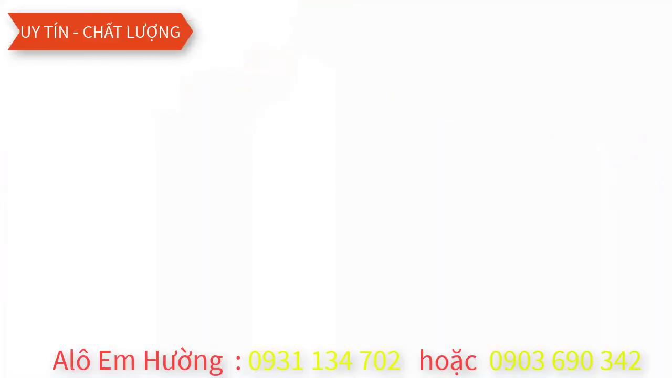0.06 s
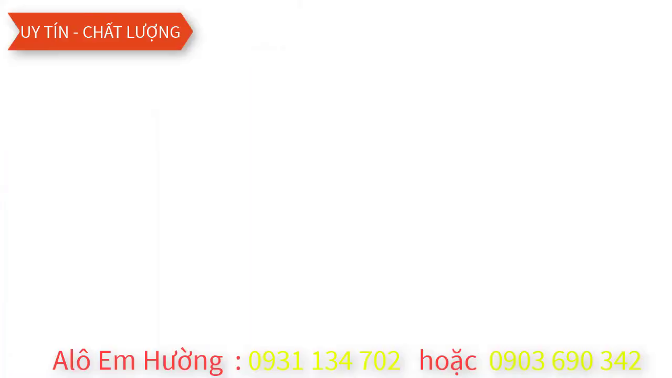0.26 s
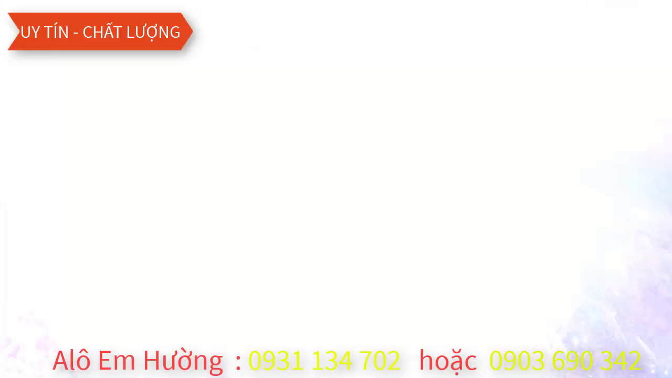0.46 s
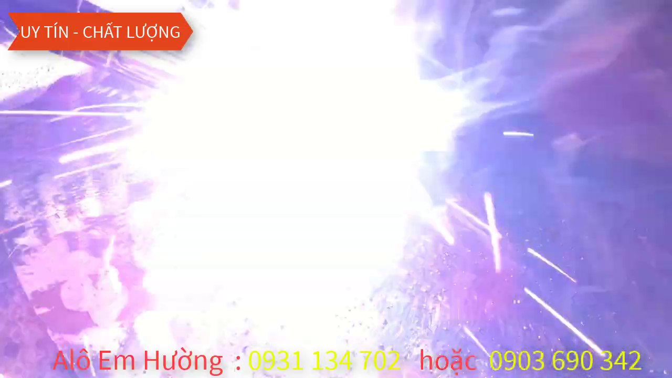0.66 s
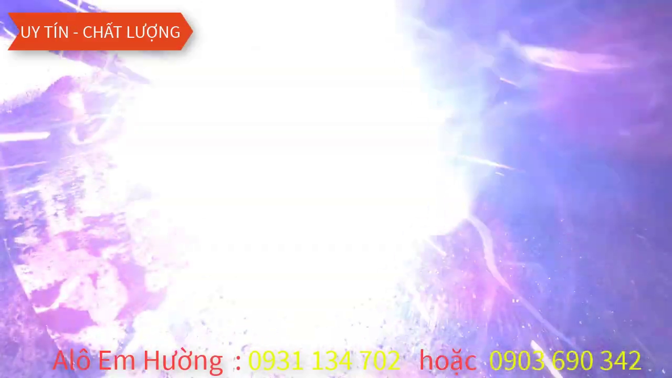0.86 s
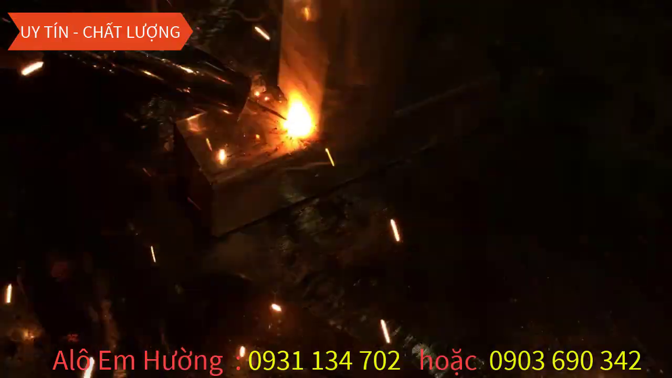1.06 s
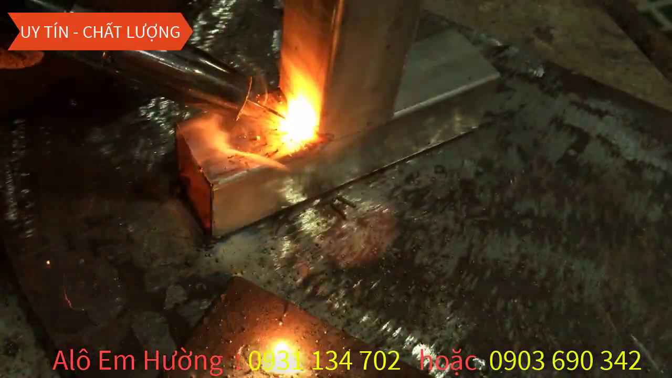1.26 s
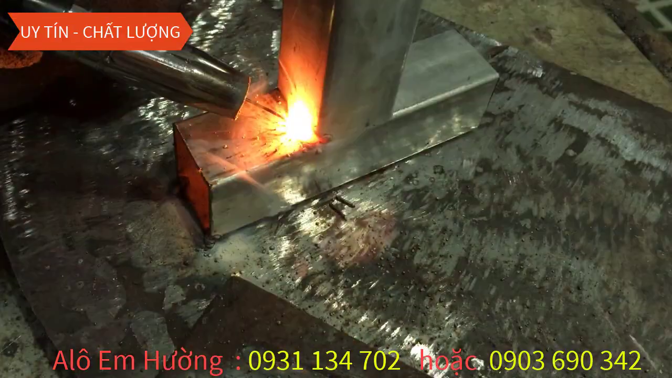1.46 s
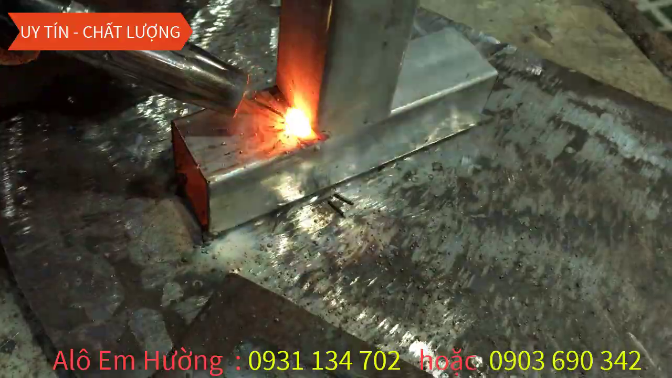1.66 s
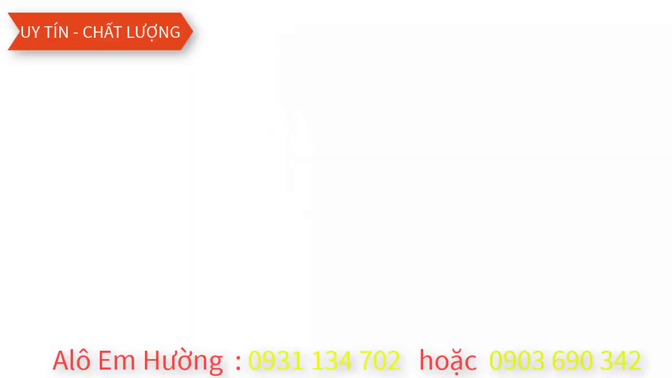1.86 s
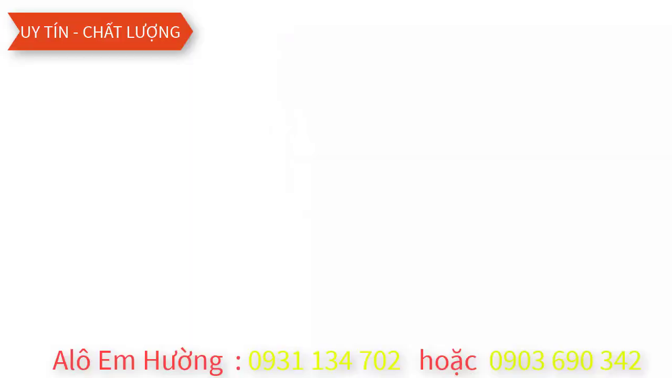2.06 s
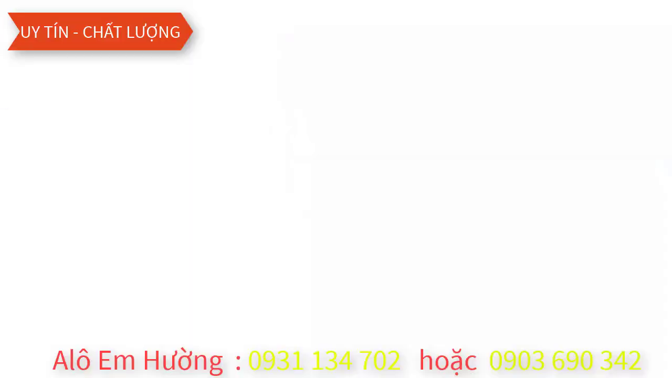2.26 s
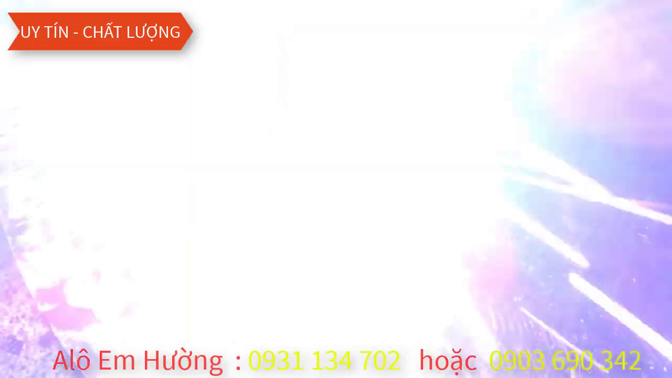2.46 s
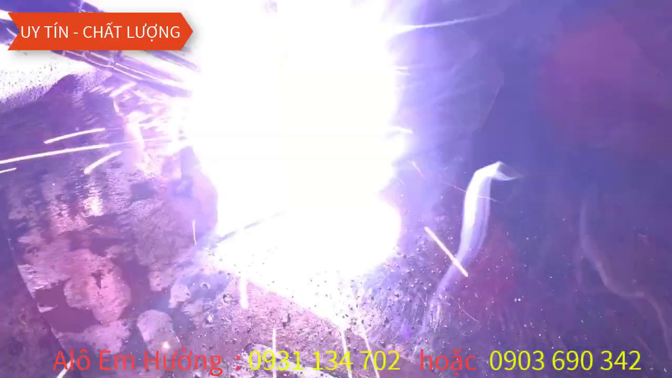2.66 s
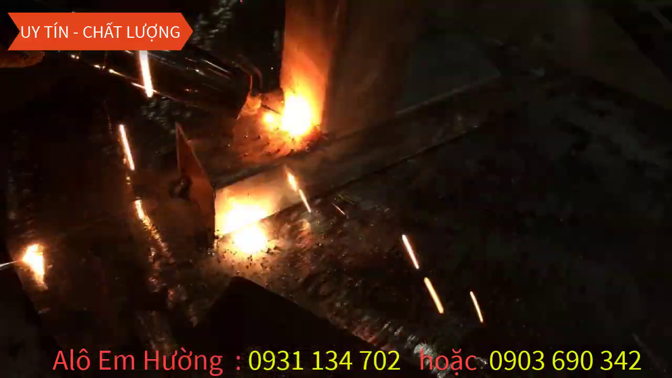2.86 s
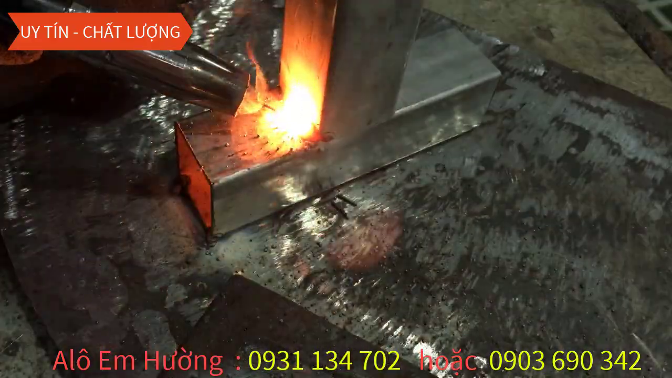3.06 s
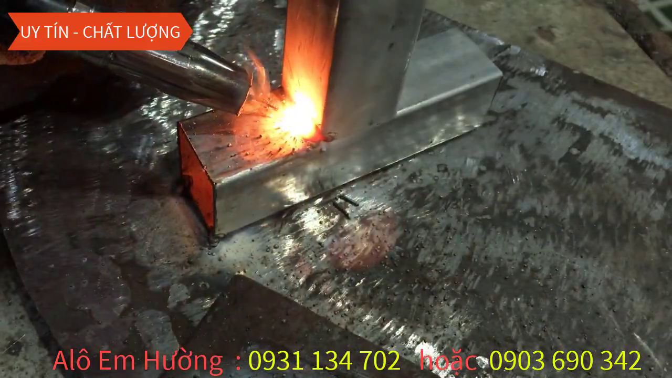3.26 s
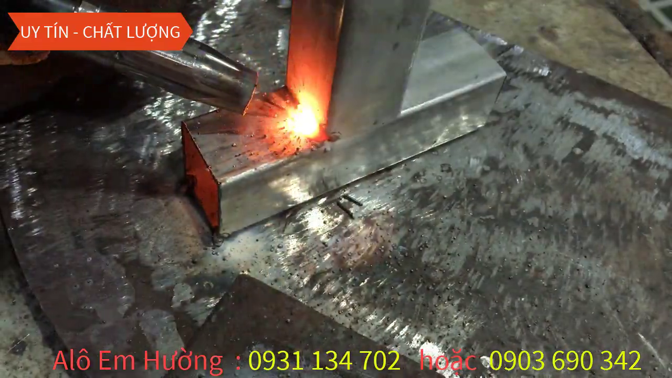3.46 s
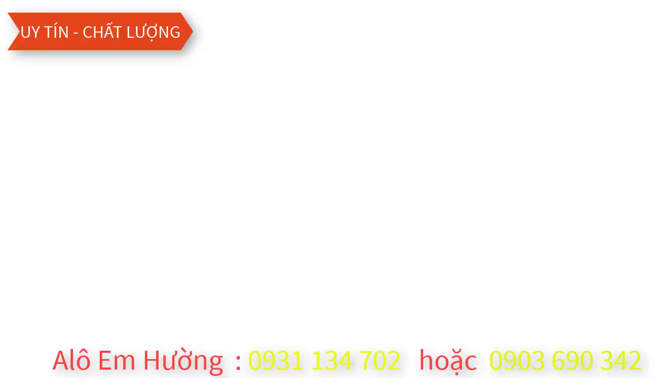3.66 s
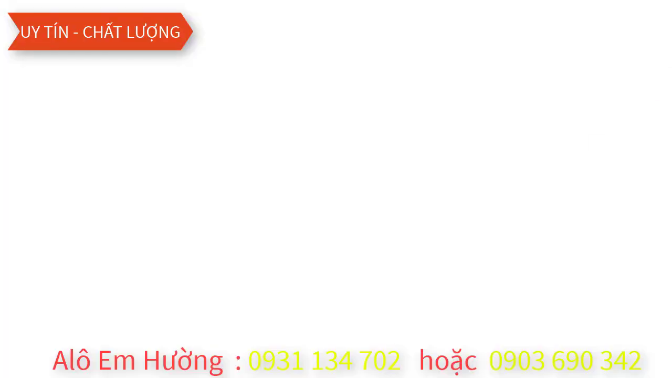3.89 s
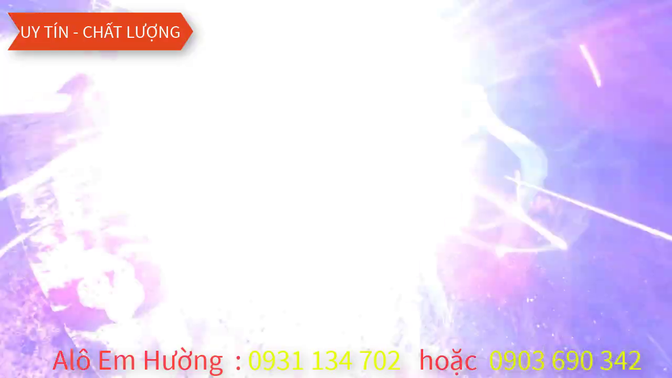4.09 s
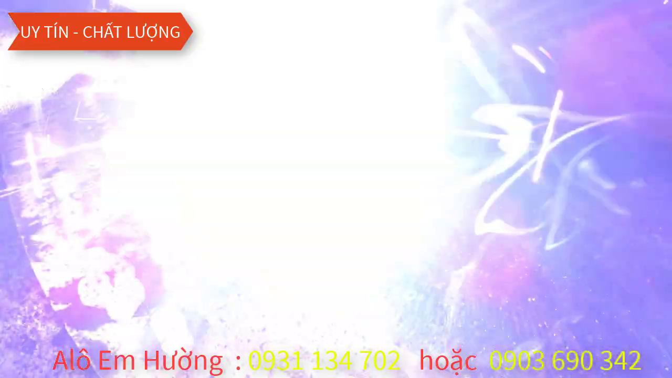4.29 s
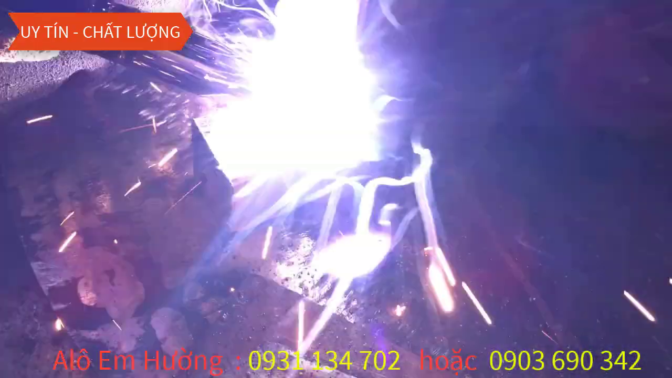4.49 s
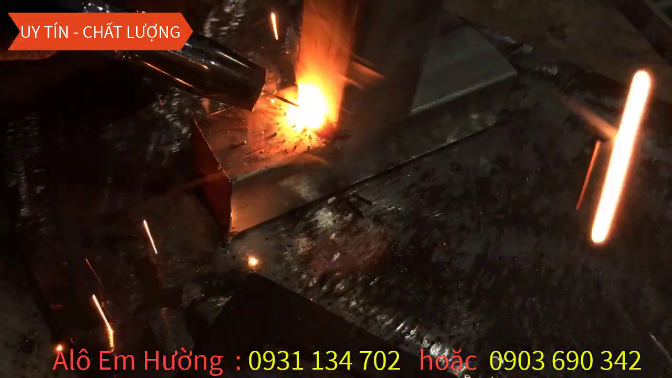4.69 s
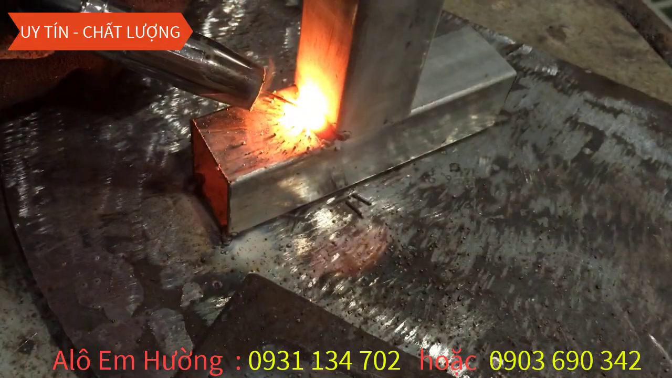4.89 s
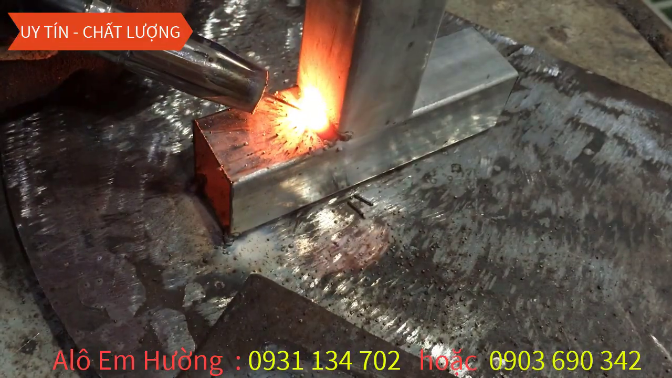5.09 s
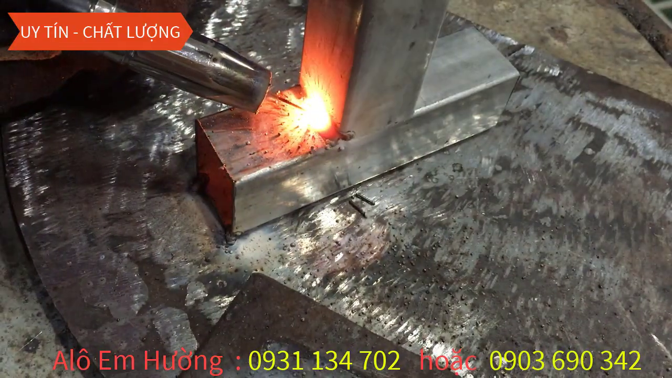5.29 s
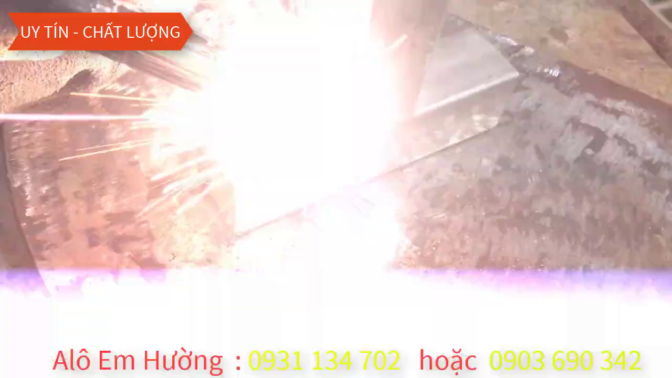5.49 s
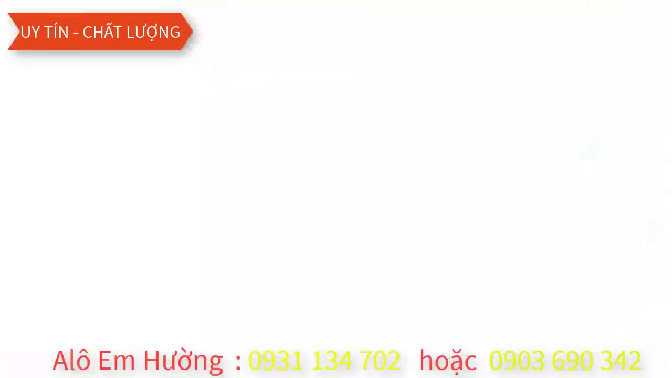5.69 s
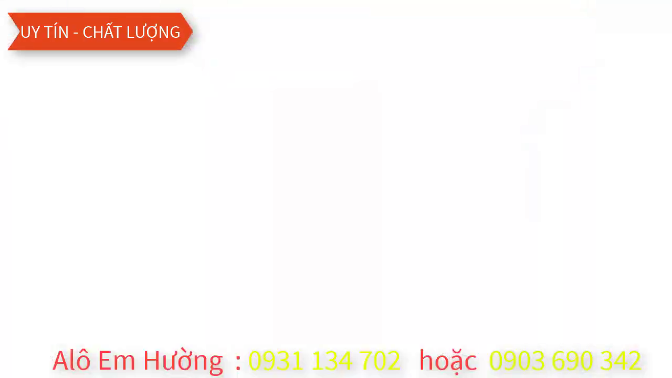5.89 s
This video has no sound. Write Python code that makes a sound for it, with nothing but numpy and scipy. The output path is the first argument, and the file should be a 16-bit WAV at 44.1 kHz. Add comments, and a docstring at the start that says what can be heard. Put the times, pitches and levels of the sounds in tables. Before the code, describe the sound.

Short bursts of arc welding spit, snap and pop very close by, stopping and restarting over a faint workshop fan.

```python
"""A flux-cored welding arc crackles in four short runs on steel tubing, very close to the microphone.
Each short circuit makes the arc's gas jump in pressure and radiate a sharp crack; between them the
pool sizzles and gurgles. In the pauses the cooling bead ticks and a machine fan drones in the workshop.
The recorder delays low frequencies more than high ones, dispersing each jump into a falling thump."""
import sys
import numpy as np
from scipy import signal
from scipy.fft import rfft, irfft, next_fast_len
from scipy.io import wavfile
from scipy.ndimage import map_coordinates

SR = 44100
rng = np.random.default_rng(int(sys.argv[2]) if len(sys.argv) > 2 else 0)


def store_pcm(level_fs):
    """Save levels as 16-bit WAV."""
    pcm = np.round(np.clip(level_fs, -1, 1) * 32767).astype(np.int16)
    wavfile.write(sys.argv[1], SR, np.atleast_2d(pcm).T)


N = 261954

# fan air noise, banded by the machine's housing: frequency_hz, relative_db
FAN_SPECTRUM = [(18, -31), (30, -10), (69, -6.5), (250, -11.5), (374, -11.5), (600, -9.5), (774, -13),
                (1200, -11.5), (1480, -15), (1700, -26), (1910, -17.5), (2140, -28.5), (2530, -20),
                (3000, -28), (3450, -22.5), (4100, -25.5), (4830, -30), (5660, -26.5), (6960, -31.5),
                (7720, -37.5), (15000, -43.5)]
# fan tones: pitch_hz, relative_db
FAN_TONES = [(372, -14), (467, -24), (652, -8), (870, -18), (1305, -14.5), (1491, -5.5), (1958, -26)]
# dip of the drone, one per run: depth_db
DRONE_DIPS = [-19.5, -17, -14.5, -10]
# sizzle envelope from strike to extinction, one list per run: time_s, level_db
ARC_RUNS = [
    [(.022, -57), (.057, -18), (.11, -42), (.152, -45.5), (.186, -40), (.274, -49), (.342, -35.5),
     (.385, -33.5), (.5, -37), (.618, -34.5), (.83, -30.5), (.93, -33.5), (1.1, -31.5), (1.122, -41.5)],
    [(1.888, -46), (1.913, -37), (1.919, -21), (2.0, -23), (2.03, -31.5), (2.074, -31.5), (2.147, -23.5),
     (2.4, -27.5), (2.479, -19.5), (2.66, -27), (2.822, -30.5), (2.849, -40.5)],
    [(3.62, -44), (3.645, -44), (3.664, -21), (3.714, -23), (3.778, -37.5), (3.95, -34), (3.97, -26),
     (4.03, -27.5), (4.232, -26), (4.352, -31), (4.558, -26.5), (4.666, -35), (4.684, -43)],
    [(5.594, -36), (5.622, -38.5), (5.63, -23), (5.65, -22.5), (5.709, -47), (5.738, -29), (5.809, -41),
     (5.94, -35.5)],
]
# arc noise in the tube corner: frequency_hz, relative_db
ARC_SPECTRUM = [(880, -32.5), (1500, -2.5), (2680, -10), (3680, -2.5), (4140, 0), (4660, -3.5), (5290, 0),
                (6320, -4.5), (8170, -5.5), (8840, -1), (10100, -16.5), (11800, -5.5), (14300, -9),
                (15800, -7.5)]
# distinct droplet snaps: start_s, relative_db, body_db (weight of the jump against the crack)
SNAPS = [(0.0257, 1, -22), (0.0545, -3, -20), (0.1284, -11, -19), (0.1939, -13, -14), (0.385, -4, -15),
         (0.4124, -8, -14), (0.4433, -7, -11), (0.4909, -10, -9), (0.5312, -4, -10), (0.6612, -9, -10),
         (0.7209, -5, -11), (0.7608, -5, -14), (0.7763, -7, -14), (0.8134, -7, -13), (0.9297, -7, -11),
         (0.9472, -6, -10), (1.8911, -1, -22), (1.9673, -2, -15), (1.9816, -1, -13), (1.993, -2, -11),
         (2.0119, -4, -19), (2.0487, -4, -18), (2.0524, -2, -10), (2.0586, -6, -16), (2.0622, -1, -12),
         (2.0839, 0, -11), (2.0865, 1, -10), (2.0892, 0, -12), (2.0962, -1, -11), (2.1096, 0, -11),
         (2.1226, -1, -9), (2.1379, -2, -11), (2.1446, -2, -11), (2.1509, -1, -11), (2.1723, -3, -15),
         (2.1774, -1, -12), (2.1805, -2, -14), (2.1899, -3, -13), (2.2046, -2, -16), (2.2339, 0, -13),
         (2.2498, 0, -11), (2.257, 0, -9), (2.2647, 1, -12), (2.2765, -2, -8), (2.2809, -2, -10),
         (2.2985, -2, -13), (2.3111, 0, -13), (2.3234, -3, -10), (2.3264, -4, -15), (2.3389, -4, -18),
         (2.3511, -4, -14), (2.3566, -2, -17), (2.3628, -3, -17), (2.3781, -2, -14), (2.3845, -1, -11),
         (2.387, -1, -9), (2.4494, -3, -13), (2.4539, -3, -14), (2.4693, -2, -13), (2.4743, 0, -9),
         (2.4884, -1, -11), (2.4952, -1, -14), (2.5238, -1, -13), (2.5683, -1, -9), (2.5888, -2, -10),
         (2.6144, -3, -11), (2.6467, -1, -5), (2.6533, -3, -9), (2.6665, -6, -7), (2.6747, -4, -13),
         (2.7531, -4, -11), (2.8129, -8, -16), (3.6238, 1, -22), (3.6537, -1, -17), (3.6702, -1, -14),
         (3.6886, -1, -9), (3.7039, -2, -11), (3.7162, -2, -14), (3.752, 0, -10), (3.7907, -9, -21),
         (3.8786, -6, -18), (3.964, 0, -12), (3.9717, 0, -10), (3.9785, -1, -19), (3.9812, 1, -14),
         (3.9852, -3, -19), (3.9917, -1, -14), (4.0319, -4, -18), (4.0533, -2, -17), (4.0697, -1, -20),
         (4.0775, -1, -14), (4.091, -4, -16), (4.1042, -2, -11), (4.1199, -1, -14), (4.1327, -3, -24),
         (4.1385, -3, -13), (4.148, -1, -9), (4.159, 0, -15), (4.1753, 0, -12), (4.2074, -1, -10),
         (4.2183, 1, -14), (4.2264, 0, -11), (4.2303, -2, -11), (4.2359, -1, -11), (4.2581, -3, -9),
         (4.3209, -5, -14), (4.3394, -5, -13), (4.3831, -4, -14), (4.4105, -2, -12), (4.4163, -2, -11),
         (4.4306, -1, -18), (4.495, -4, -14), (4.5113, -3, -13), (4.5178, -4, -15), (4.5584, -5, -10),
         (4.5659, -5, -16), (4.5706, -5, -18), (4.5924, -5, -12), (4.6071, -3, -8), (4.621, -1, -13),
         (5.6292, -6, -27), (5.6331, -2, -20), (5.8494, -10, -15), (5.8699, -10, -21), (5.9353, -4, -12)]
# short circuits: start_s, jump_amplitude (signed), settle_ms, crack_relative_db
POPS = [(0.0774, -1.82, 18, 2), (0.1494, 1.9, 11, -5.5), (.2796, -1.66, 2.3, -3.5), (0.3706, 0.75, 3.9, -3),
        (0.3777, 0.5, 4, -8), (0.3808, 1.37, 6.1, -3), (0.3931, 0.8, 9.5, -1), (.4334, 1, 0.71, 2),
        (0.4355, 0.1, 2.4, -20), (.4574, -1.84, 3.5, -5), (.5119, 2.1, 2.1, -15), (.556, 0.78, 0.82, -3),
        (0.6377, -0.05, 2.6, -6.5), (.8498, 1.8, 2.2, -9), (0.8545, -1.3, 0.85, -8),
        (0.8784, -1.35, 3.1, -8), (0.8917, 1.5, 5.1, -2.5), (0.8991, -1.6, 3.9, -14),
        (0.9248, 1.2, 1.5, -8), (.926, -1.1, 1.5, -8), (0.9288, 1, 1, -10), (0.9437, 0.87, 2.6, -4),
        (0.9634, 0.7, .8, -5.5), (0.9946, -1.4, 1.7, -6.5), (1.0153, 1.45, 2, -26),
        (1.0619, 0.9, 0.78, -8.5), (1.9312, -1.06, 2.1, 4.5), (1.934, 0.5, 3.7, 1), (1.9443, 0.6, 9, -18),
        (2.002, 1.5, 8.3, -17), (2.1834, 0, 1.6, -3), (2.2282, 0.73, 7.3, 3), (2.586, 0.63, 9, -3),
        (2.619, 1.75, 12, -1), (2.6344, 1.8, 1.8, -2), (2.6358, -1.5, 3.6, -10), (2.7271, -1.78, 2.6, -9),
        (2.7475, 1.7, 1.2, -5), (2.7637, 2.3, 0.65, -7), (2.7896, 0.5, 1.6, -15), (2.7966, -1.2, 1, -7.5),
        (3.696, 0.45, 12, -8), (3.6965, 0.5, 4, -17), (3.7127, -0.9, 5.2, -1), (3.7234, 2, 14, -16),
        (3.7801, 0.7, 1.1, -3.5), (4.2537, 1.68, 6.3, -13), (4.2795, -1.1, 5.9, -2), (4.2893, 1.43, 11, 0),
        (4.3138, -1, 9.7, -1), (4.3426, -0.7, 0.88, -4.5), (4.4132, 0.86, 1.2, 0.5), (4.5544, 1.4, 6.2, -6),
        (4.611, 1.6, 2.3, -4), (4.6483, 0.3, 2.4, -10.5), (5.5971, 1.46, 8.5, -1.5),
        (5.6536, -1.44, 8.2, -4), (5.7458, .9, 11, -7), (5.7496, 2.5, 3.9, -9), (5.8215, -1.0, 0.68, -12),
        (5.8937, -.4, 0.51, -4.5)]
# swarms of small pressure jumps in the pool: start_s, length_s, level_db
GURGLES = [(.35, 0.022, -19), (.637, 0.0057, -16.5), (1.941, 0.0051, -7), (1.972, .022, -8),
           (2.4, 0.0094, -13), (3.688, 0.027, -15), (5.685, .04, -19), (5.724, 0.017, -11),
           (5.808, 0.012, -20)]
# ticks of the cooling bead: start_s, relative_db
TICKS = [(1.25, -49.5), (1.8034, -34.5), (3.5084, -35), (4.9867, -35), (5.1053, -39), (5.178, -34),
         (5.4725, -33)]
# second-order high-pass stages: cutoff_hz, quality_factor
LOW_CUTS = [(59.6, 1.085), (36, 1.29)]
# all-pass stages that delay the bass: corner_hz
ALL_PASSES = [270, 270, 330]


def amp(db):
    """Amplitude grows tenfold for every 20 dB."""
    return 10 ** (np.asarray(db) / 20)


def unit_rms(x):
    """Normalisation to unit mean power."""
    return x / np.sqrt(np.mean(x ** 2))


def wobble(rate_hz):
    """Spline interpolation of random values gives a smooth fluctuation."""
    knots = rng.standard_normal(int(N * rate_hz / SR) + 4)
    return map_coordinates(knots, [np.arange(N) * rate_hz / SR])


def filtered(x, response):
    """A linear filter multiplies the spectrum by its frequency response."""
    size = next_fast_len(N + SR // 2)
    return irfft(rfft(x, size) * response(np.fft.rfftfreq(size, 1 / SR)), size)[..., :N]


def coloured(x, spectrum):
    """Minimum-phase filtering: folding the cepstrum gives a causal response with the given spectrum."""
    hz, db = np.transpose(spectrum)
    size = 2 ** 13
    gain = unit_rms(amp(np.interp(np.log(np.fft.rfftfreq(size, 1 / SR) + 1), np.log(hz), db)))
    cepstrum = irfft(np.log(gain))
    fold = np.r_[1, np.full(size // 2 - 1, 2), np.zeros(size // 2)]
    return signal.fftconvolve(x, irfft(np.exp(rfft(cepstrum * fold))))[:N]


def place(start_s, pulses):
    """Superposition of pulses, one per row, each at its start time."""
    index = np.round(start_s * SR).astype(int)[:, None] + np.arange(pulses.shape[1])
    return np.bincount(index.ravel(), pulses.ravel(), N + SR)[:N]


def jumps(start_s, height, settle_ms, samples):
    """Pressure steps relax exponentially; the gas cannot follow above a few kHz."""
    t_ms = np.arange(samples) / SR * 1000
    steps = place(start_s, height[:, None] * np.exp(-t_ms / np.reshape(settle_ms, (-1, 1))))
    return filtered(steps, lambda hz: 1 / (1 + 1j * hz / 4500) ** 2)


def cracks(start_s, db, shock, t60_s, tail_db, tail_t60_s):
    """A shock front leads an exponentially decaying noise burst and a weaker tail from nearby steel."""
    t = np.arange(600) / SR
    envelope = amp(-60 * t / t60_s) + amp(tail_db - 60 * t / tail_t60_s)
    pulses = envelope * rng.standard_normal((len(start_s), len(t))) - shock * (t == 0)
    return coloured(place(start_s, amp(db)[:, None] * pulses), ARC_SPECTRUM)


def fan():
    """Broadband air noise lies under tones that waver by amplitude and phase modulation."""
    t = np.arange(N) / SR
    tones = sum(amp(db + 3.5 + 1.2 * wobble(9.1)) * np.sin(2 * np.pi * (hz * t + 0.042 * wobble(7.1)))
                for hz, db in FAN_TONES)
    air = amp(-3.5 + wobble(7)) * unit_rms(coloured(rng.standard_normal(N), FAN_SPECTRUM))
    return air + tones


def drone_gain(rest_db=-35.5, sink_s=0.21, hold_s=0.029, return_db_per_s=27.5):
    """An envelope linear in decibels: the drone sinks as each run starts and climbs back after it."""
    t, dips = np.arange(N) / SR, []
    for run, depth_db in zip(ARC_RUNS, DRONE_DIPS):
        start_s, stop_s = run[0][0], run[-1][0]
        sink_db = depth_db * np.clip((t - start_s) / sink_s, 0, 1)
        dips.append(sink_db + return_db_per_s * np.maximum(t - stop_s - hold_s, 0))
    return amp(rest_db + np.minimum(np.min(dips, axis=0), 0))


def sizzle_level(drop_db=9, fade_db_per_s=330):
    """The envelope in dB follows each run; at extinction the sound drops, then decays exponentially."""
    t, level_db = np.arange(N) / SR, np.full(N, -120.)
    for run in ARC_RUNS:
        time_s, db = np.transpose(run)
        after_s = np.maximum(t - time_s[-1], 0)
        run_db = np.interp(t, time_s, db) - drop_db * (after_s > 0) - fade_db_per_s * after_s
        level_db = np.where(t >= time_s[0], np.maximum(level_db, run_db), level_db)
    return level_db


def arc_hiss(sizzle_db, cutoff_hz=2500):
    """The wandering arc root modulates the amplitude of high-passed noise."""
    flutter_db = 1.23 * wobble(45) + 2.1 * wobble(260)
    hiss = amp(sizzle_db + flutter_db) * coloured(rng.standard_normal(N), ARC_SPECTRUM)
    return filtered(hiss, lambda hz: 1j * hz / (cutoff_hz + 1j * hz))


def fine_droplets(sizzle_db, count=2200):
    """Shot noise: tiny droplets snap at random moments, most faintly, a few standing out."""
    when, strength, settle = rng.random((count, 3)).T
    start_s = when * (N - 1) / SR
    db = sizzle_db[(start_s * SR).astype(int)] + np.minimum(-3.5 * np.log(strength), 13)
    crack = cracks(start_s, db + 5, shock=2.45, t60_s=0.002, tail_db=-19.5, tail_t60_s=0.006)
    return crack + jumps(start_s, -amp(db + 8), settle_ms=0.058 + 0.36 * settle ** 3, samples=180)


def droplet_snaps():
    """Fast relaxation of the gas makes a brief snap; the less body it has, the stronger its crack."""
    start_s, db, body_db = np.transpose(SNAPS)
    crack_db = db - 7 - 0.33 * (body_db - body_db.mean())
    crack = cracks(start_s, crack_db, shock=1.9, t60_s=0.0038, tail_db=-16.5, tail_t60_s=0.0095)
    return crack + jumps(start_s, -amp(db + body_db + 18.5), settle_ms=0.043, samples=200)


def short_circuits():
    """Impulsive excitation: each short circuit blows the pool open with a pressure step and a crack."""
    start_s, height, settle_ms, db = np.transpose(POPS)
    crack = cracks(start_s, db - 8, shock=3.1, t60_s=0.0058, tail_db=-18, tail_t60_s=0.0095)
    return crack + jumps(start_s, height, settle_ms, samples=1900)


def pool_gurgles(per_swarm=12, scatter_db=3.5):
    """Pressure jumps of random sign and timing superpose into a gurgle."""
    start_s, length_s, db = np.repeat(GURGLES, per_swarm, axis=0).T
    when, sign, size = rng.random((len(start_s), 3)).T
    height = np.sign(sign - .5) * amp(db + scatter_db * (2 * size - 1))
    return jumps(start_s + when * length_s, height, settle_ms=0.44 * (.5 + size), samples=300)


def bead_ticks():
    """The cooling bead radiates faint, quickly damped transients."""
    start_s, db = np.transpose(TICKS)
    return cracks(start_s, db - 3, shock=1.2, t60_s=0.003, tail_db=-8, tail_t60_s=0.012)


def scene():
    """The pressures of arc, fan and bead superpose at one microphone."""
    crackle = short_circuits() + droplet_snaps()
    sizzle_db = sizzle_level()
    sizzle = arc_hiss(sizzle_db) + fine_droplets(sizzle_db)
    return (crackle + sizzle + pool_gurgles() + drone_gain() * fan() + bead_ticks())[None]


def record(dry, hiss_db=-77, ceiling=0.99, top_hz=15900):
    """Group delay in the bass spreads each step into a down-chirp; saturation rounds off the peaks."""
    def response(hz):
        s = 1j * hz
        high_pass = np.prod([s * s / (s * s + s * fc / q + fc * fc) for fc, q in LOW_CUTS], axis=0)
        all_pass = np.prod([(s - fc) / (s + fc) for fc in ALL_PASSES], axis=0)
        return high_pass * all_pass
    dispersed = filtered(dry + amp(hiss_db) * rng.standard_normal(N), response)
    saturated = dispersed / (1 + np.abs(dispersed / ceiling) ** 12) ** (1 / 12)
    return filtered(saturated, lambda hz: 1 / (1 + (hz / top_hz) ** 120))


dry = scene()
out = record(dry)
store_pcm(out)
```